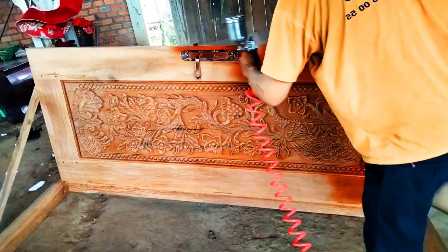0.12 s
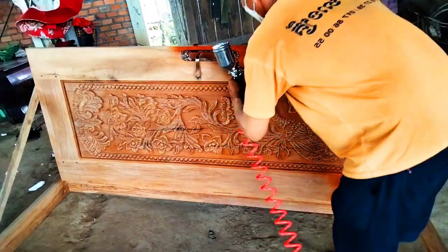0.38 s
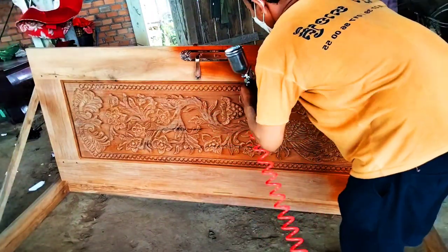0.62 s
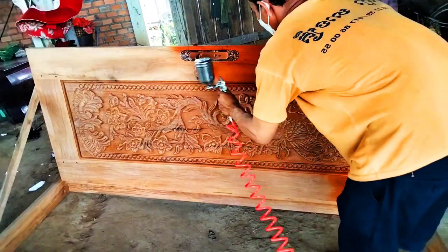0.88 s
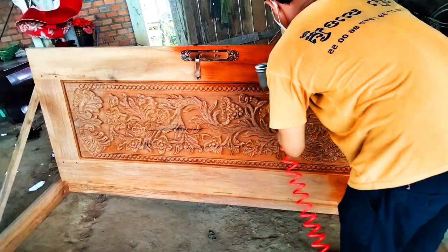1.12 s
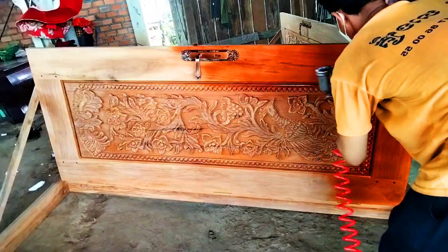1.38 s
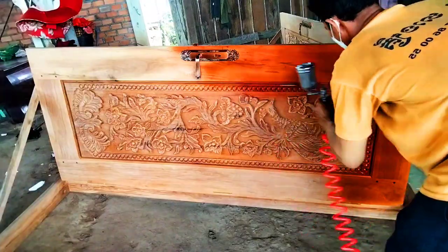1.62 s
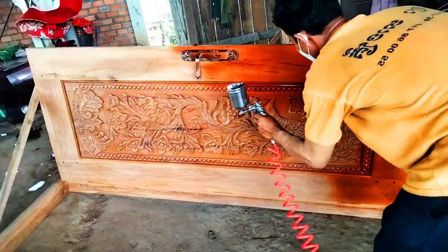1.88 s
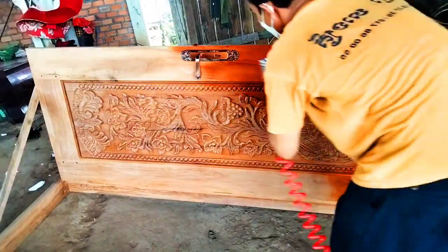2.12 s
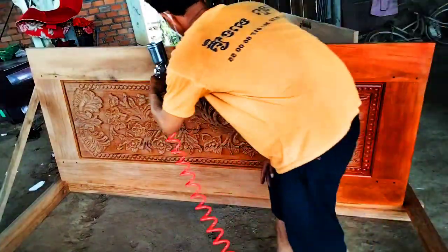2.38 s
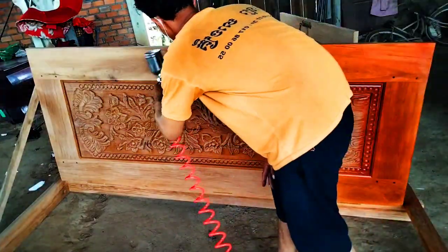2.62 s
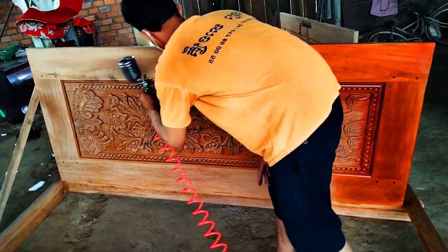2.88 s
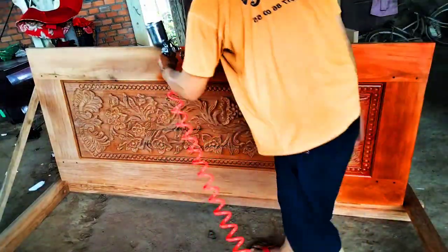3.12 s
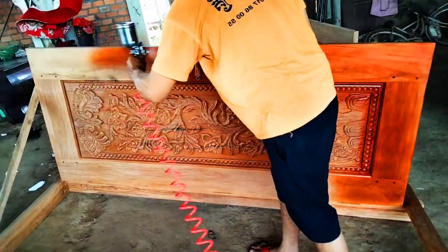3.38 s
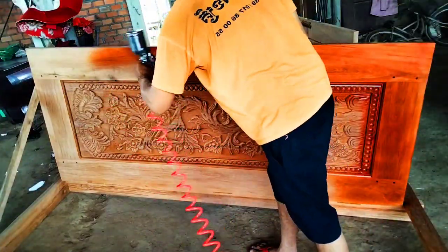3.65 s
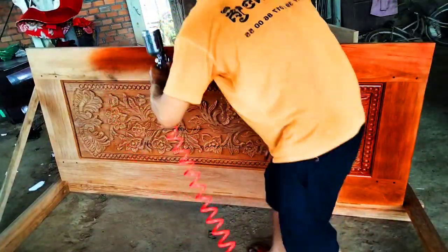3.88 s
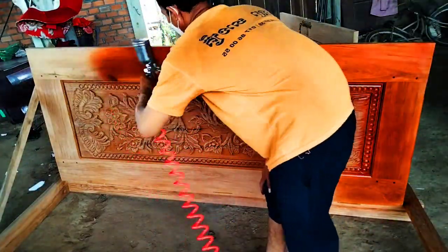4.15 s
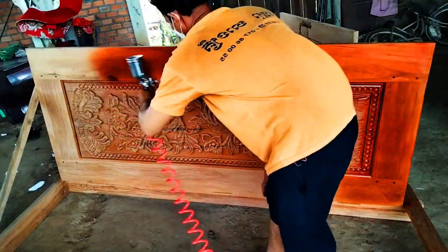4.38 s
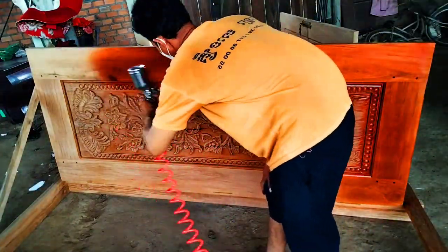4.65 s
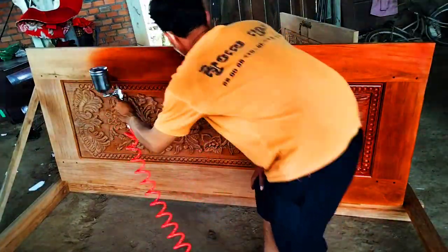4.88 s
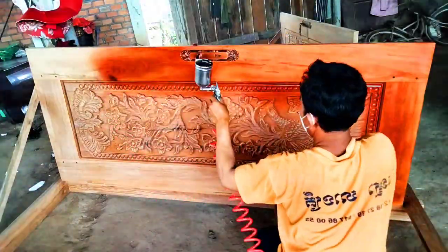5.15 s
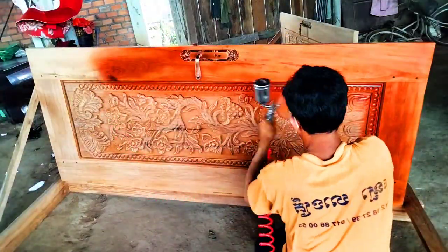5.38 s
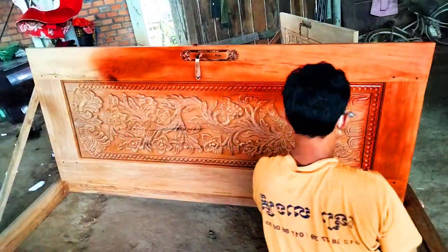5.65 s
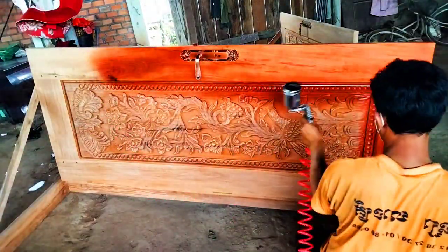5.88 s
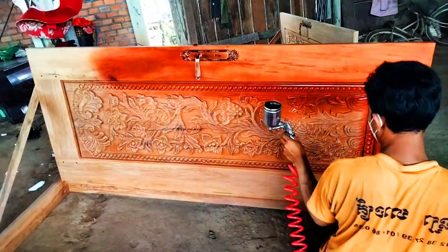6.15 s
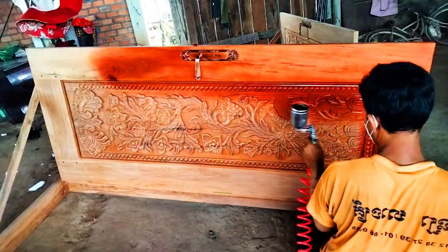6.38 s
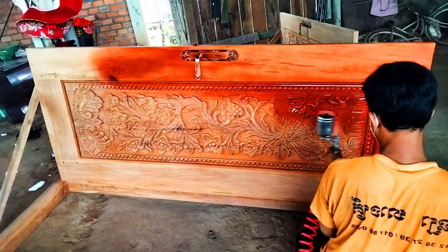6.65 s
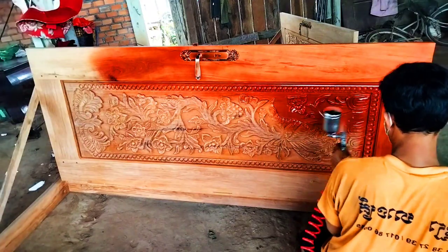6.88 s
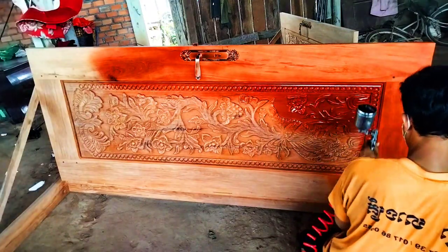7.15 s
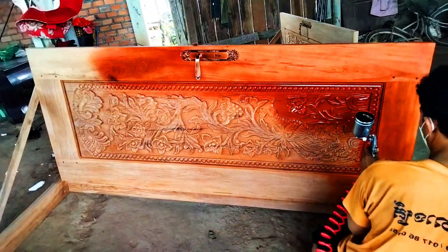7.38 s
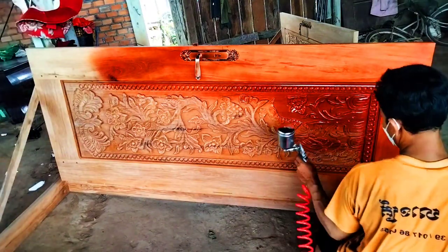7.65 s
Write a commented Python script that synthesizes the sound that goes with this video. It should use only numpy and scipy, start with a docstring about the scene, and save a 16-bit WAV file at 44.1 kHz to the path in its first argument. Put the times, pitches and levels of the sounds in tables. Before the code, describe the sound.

Continuous high mechanical whine and rushing air hiss from a paint sprayer, almost unchanging, with very faint low bumps and rumble underneath.

```python
"""An open workshop, where a spray gun lays finish on a carved wooden door.
A fast turbine whines as fluttering sines on many multiples of its shaft speed,
over the hiss of the air jet: shaped noise, heard with narrow gaps and flickering patches.
A slower motor hums below as low harmonics of an unsteady speed, in random phase.
Lumpy low noise rumbles faintly; faint low blips are short humped waves of random sign."""
import sys
import numpy as np
from scipy import signal
from scipy.io import wavfile
from scipy.ndimage import uniform_filter1d

SR = 44100
rng = np.random.default_rng(int(sys.argv[2]) if len(sys.argv) > 2 else 0)


def invert_db(level):
    """Linear amplitude ratio for a level in decibels (20 dB per decade), elementwise."""
    return 10 ** (np.asarray(level, dtype=float) / 20)


def wav_out(sig):
    """Save sig, one row per channel (or a flat mono array), as 16-bit PCM at SR to the path in sys.argv[1]."""
    wavfile.write(sys.argv[1], SR, np.round(np.clip(np.atleast_2d(sig).T, -1, 1) * 32767).astype(np.int16))


N = 342657


def rms_one(x):
    """Scale to an rms of 1."""
    return x / np.sqrt(np.mean(np.abs(x) ** 2) + 1e-20)


def in_time(rows):
    """Columns of a table, read at every sample; its first column is time in seconds."""
    s, *columns = np.transpose(rows)
    return [np.interp(np.arange(N) / SR, s, column) for column in columns]


def drift(rate_hz):
    """Slow noise of spread 1: a draw every 40 samples through a double one-pole low-pass."""
    r = np.exp(-2 * np.pi * rate_hz * 40 / SR)
    draws = rng.standard_normal(N // 40 + 2002)
    slow = signal.lfilter([1], [1, -2 * r, r * r], draws)[2000:]  # the first 2000 run the filter in
    return np.interp(np.arange(N) / 40, np.arange(len(slow)), rms_one(slow))


def angle(per_s):
    """Running angle of a shaft, in radians, from its turns per second."""
    return 2 * np.pi * np.cumsum(per_s) / SR


def partial(phase, db, rough, flutter_hz):
    """A sine whose size and phase flutter, which spreads a skirt of noise around its line."""
    size = np.sqrt(2) * invert_db(db)
    in_step = (1 + rough * drift(flutter_hz)) * np.sin(phase)
    out_of_step = rough * drift(flutter_hz) * np.cos(phase)
    return size * (in_step + out_of_step)


def shaft_speed(jitter_per_s=0.12, jitter_hz=8, twitch_s=0.025):
    """Turbine speed in turns per second: a slow course, a quick jitter and brief twitches."""
    # slow course of the turbine shaft: time_s, speed [turns per s]
    course = [(0, 359.25), (0.3, 359.4), (0.85, 359.5), (0.95, 359.05), (1.55, 358.95), (1.7, 359.1),
              (1.8, 358.85), (2.15, 359.1), (2.31, 358.65), (2.57, 358.55), (2.65, 359.1), (3.28, 359.25),
              (3.42, 359.6), (3.63, 359.8), (3.7, 359.4), (4.02, 359.25), (4.9, 359.75), (5.2, 359.55),
              (6.0, 359.7), (6.2, 359.55), (6.42, 360.25), (7.77, 360.4)]
    # brief twitches of the speed: centre_s, gain [turns per s]
    twitch_rows = [(3.36, 1.0), (6.105, -0.9)]
    t = np.arange(N) / SR
    twitches = sum(gain * np.exp(-.5 * ((t - s) / twitch_s) ** 2) for s, gain in twitch_rows)
    return in_time(course)[0] + jitter_per_s * drift(jitter_hz) + twitches


def turbine(rough=0.0024, flutter_hz=60, wander_db=0.43, waver_db=4.0):
    """No two turns are quite alike, so the high partials are the roughest."""
    # whine on shaft multiples 1, 2, 3 ..: start_level_db [dB rms], end_level_db [dB rms]
    whine_levels = [(-41, -40.5), (-40, -41), (-51.5, -47.5), (-47, -48.5), (-46, -48.5), (-56.5, -57.5),
                    (-48, -48.5), (-43, -40.5), (-60.5, -52), (-43, -45), (-36, -34.5), (-40, -48.5),
                    (-30, -31.5), (-32.5, -37.5), (-54, -41.5), (-45, -50.5), (-54.5, -48.5), (-50, -51),
                    (-44, -33.5), (-53, -43.5), (-37, -42.5), (-40.5, -42), (-52, -61), (-48.5, -44.5),
                    (-40, -66), (-46, -50), (-52, -76), (-54.5, -51), (-81, -51), (-69, -55), (-54, -50),
                    (-47, -49.5), (-56, -50), (-49, -73), (-47, -51), (-66, -40), (-48, -52), (-66, -59),
                    (-78, -59), (-74, -65), (-73, -68), (-49, -69), (-62, -78)]
    # bearing tones, whose level wavers at random: multiple [of the shaft speed], level_db [dB rms]
    bearing_tones = [(10.376, -51.5), (20.345, -72), (24.5, -55), (26.59, -54), (27.375, -70), (28.66, -66),
                     (29.438, -53.5), (30.44, -81), (32.81, -54), (37.75, -56)]
    # three high partials swell and sink: time_s, gain_13th_db, gain_19th_db, gain_21st_db
    sway_course = [(0, 0, 2, -3.5), (0.7, -1, 0.5, -3), (1.5, 0, 3, 0.5), (2.4, 0, 2.3, -1),
                   (2.9, 1, -7, -0.5), (3.6, -1, 0.5, 2.5), (3.9, 0, -7, 2.5), (4.2, 0.5, -2.5, 0),
                   (5.4, 0, -2, 2), (5.8, 1, -4.5, 0), (6.6, -1.5, -1, 0), (7.77, -2, -3, 1)]
    # which partials sway: multiple [of the shaft speed]
    swaying_multiples = (13, 19, 21)
    shaft = angle(shaft_speed())
    sway = dict(zip(swaying_multiples, in_time(sway_course)))
    out = 0
    for k, (start_db, end_db) in enumerate(whine_levels, start=1):
        db = np.linspace(start_db, end_db, N) + sway.get(k, wander_db * drift(0.99))
        # the duct smears each pulse in time: neighbours stand out of step and the whine throbs little
        phase = k * shaft + 2.28 * k ** 2
        out = out + partial(phase, db, rough * k, flutter_hz)
    for multiple, db in bearing_tones:
        out = out + partial(multiple * shaft, db + waver_db * drift(6.4), 0.066, 30)
    return out


def motor(jitter_per_s=0.25, jitter_hz=4, wander_db=0.32):
    """A hum of low harmonics of an unsteady motor speed, in random phase."""
    # course of the slower motor: time_s, fundamental_hz
    rate_course = [(0, 74.4), (0.35, 73.3), (0.6, 73.8), (1.0, 74.0), (1.4, 73.2), (1.66, 73.9),
                   (2.0, 72.8), (2.52, 73.6), (2.89, 72.8), (3.3, 75.2), (3.5, 74.2), (3.75, 75.4),
                   (4.13, 73.2), (4.66, 75.7), (5.03, 73.8), (5.3, 74.8), (5.64, 73.6), (6.2, 75.0),
                   (6.54, 74.3), (7.1, 75.2), (7.3, 74.2), (7.77, 74.3)]
    # its multiples 4, 5, 6 ..: level_db [dB rms]
    hum_levels = [-60, -57, -68.5, -47, -68.5, -53, -55, -57, -47.5, -55, -55.5, -65, -63, -61.5, -63.5,
                  -53, -62]
    shaft = angle(in_time(rate_course)[0] + jitter_per_s * drift(jitter_hz))
    out = 0
    for k, db in enumerate(hum_levels, start=4):
        phase = k * shaft + 2 * np.pi * rng.random()
        out = out + partial(phase, db + wander_db * drift(6.3), 0.13, 15)
    return out


def jet(level_db=-33, patchy_db=2.0, gap_flicker=0.63, ripple_db=-0.5, treble_flicker_db=1.6):
    """Hiss of turbulent air as shaped noise, heard with narrow gaps and flickering patches laid over it."""
    # colour of the air jet: pitch_hz, relative density_db [dB per Hz]
    colour = [(100, -80), (170, -48), (240, -14), (310, -2.5), (1000, -1), (1500, -2.5), (2200, -5),
              (3000, -3), (3800, 1.5), (4800, 3), (5700, -3), (6700, 1), (8000, -2), (9800, -7),
              (11500, -5), (13500, -5.5), (15500, -8)]
    # narrow gaps heard in the hiss: pitch_hz, width_hz, depth_db [before the flicker]
    gap_rows = [(1290, 80, -5), (1700, 100, -3), (2200, 150, -3), (3120, 120, -6), (3450, 150, -9),
                (4140, 130, -10), (4520, 60, -5), (5170, 120, -4), (5930, 150, -3), (7060, 170, -12),
                (7400, 130, -10), (7760, 100, -7), (8140, 130, -13), (8400, 120, -7), (9200, 100, -5),
                (9480, 150, -7), (9900, 100, -5), (10160, 110, -9), (10720, 110, -8), (12370, 150, -8),
                (12730, 160, -9), (13500, 100, -5), (13900, 150, -5), (14250, 120, -5), (14650, 150, -5)]
    hz, s, hiss = signal.stft(rng.standard_normal(N), SR, nperseg=2048)
    colour_hz, colour_db = np.transpose(colour)
    db = np.interp(np.log(hz + 1), np.log(colour_hz), colour_db)
    # many weak echoes of the shed ripple the spectrum
    db = db + ripple_db * rms_one(uniform_filter1d(rng.standard_normal(len(hz)), size=3))

    # small patches of pitch and time, deeper toward the treble
    field = uniform_filter1d(rng.standard_normal(hiss.shape), size=4, axis=0)
    patches = rms_one(uniform_filter1d(field, size=2, axis=1))
    db = db[:, None] + patchy_db * (1 + hz[:, None] / 15000) * patches

    # the whole treble flickers together
    shared = rms_one(uniform_filter1d(rng.standard_normal(len(s)), size=2))
    treble = np.clip(hz / 6000 - 1, 0, 1)
    db += treble_flicker_db * np.outer(treble, shared)

    for gap_hz, width_hz, depth_db in gap_rows:
        flicker = rms_one(uniform_filter1d(rng.standard_normal(len(s)), size=2))
        depth = depth_db * np.maximum(1 + gap_flicker * flicker, 0)  # a gap opens and closes
        shape = np.exp(-.5 * ((hz - gap_hz) / (.5 * width_hz)) ** 2)
        db += np.outer(shape, depth)
    shaped = signal.istft(hiss * invert_db(db), SR, nperseg=2048)[1][:N]
    return invert_db(level_db) * rms_one(shaped)


def rumble(lumpy_db=5.5):
    """Low noise in short lumps."""
    # faint rumble that comes and goes: time_s, level_db [dB rms]
    level_course = [(0, -64), (0.95, -58), (1.2, -75), (2.0, -66), (3.0, -67), (3.3, -90), (7.77, -82)]
    band = signal.butter(3, [140, 270], "band", fs=SR, output="sos")
    low = signal.sosfilt(band, rng.standard_normal(N))
    lumps = rms_one(low * invert_db(lumpy_db * drift(21.5)))
    return invert_db(in_time(level_course)[0]) * lumps


def low_blips():
    """Faint low blips, each a short humped wave of random sign."""
    # low blips: centre_s, level_db [dB peak], pitch_hz, length_s
    blip_rows = [(0.089, -54, 165, .024), (0.26, -47, 105, .024), (0.31, -47, 118, 0.016),
                 (0.442, -49, 158, .024), (0.514, -49, 65, .024), (0.547, -46, 108, 0.022),
                 (0.615, -46, 40, .026), (0.65, -49, 26, .03), (0.695, -52, 25, .03),
                 (0.772, -50, 76, 0.028), (0.853, -46, 60, .024), (0.87, -45, 23, 0.1),
                 (0.97, -48, 149, .024), (1.342, -46, 40, .05), (1.355, -44, 120, .024),
                 (1.652, -44, 48, .024), (2.288, -46, 64, 0.022), (2.35, -48, 135, 0.022),
                 (2.372, -45, 51, .024), (2.439, -48, 50, .024), (2.606, -42, 55, 0.026),
                 (2.634, -50, 30, .03), (2.821, -45, 48, .04), (3.026, -50, 48.2, 0.028),
                 (4.436, -50, 47.9, 0.028), (6.425, -50, 48.42, 0.026)]
    out, t = np.zeros(N), np.arange(N) / SR
    for (s, db, hz, length), turn in zip(blip_rows, rng.random((len(blip_rows), 1))):
        near = slice(round((s - length / 2) * SR), round((s + length / 2) * SR))
        since = t[near] - s
        hump = np.cos(np.pi * since / length) ** 2
        half_turn = .5 * np.round(turn)  # 0 or half a cycle
        out[near] += invert_db(db) * hump * np.cos(2 * np.pi * (hz * since + half_turn))
    return out


def spectral_holes(x, under_db=4.5, depth_db=-30.0):
    """Whatever lies well under its spectral surroundings drops out, leaving holes."""
    hz, s, spectra = signal.stft(x, SR, nperseg=2048)
    power = uniform_filter1d(np.abs(spectra) ** 2 + 1e-20, size=3, axis=-2)
    near_db = 10 * np.log10(uniform_filter1d(power, size=2, axis=-1) + 1e-20)
    around_db = uniform_filter1d(uniform_filter1d(near_db, size=61, axis=-2), size=9, axis=-1)
    margin_db = under_db * (1 - hz[:, None] / 30000)  # stricter in the treble
    hole = np.clip((around_db - margin_db - near_db) / 4, 0, 1)  # full depth 4 dB past the margin
    return signal.istft(spectra * invert_db(depth_db * hole), SR, nperseg=2048)[1][:, :N]


def scene():
    """One microphone feeds both channels."""
    mono = turbine() + motor() + jet() + rumble() + low_blips()
    return np.tile(mono, (2, 1))


def band_limit(x):
    """A steep low-pass at the top of the band."""
    return signal.sosfilt(signal.butter(12, 16570, fs=SR, output="sos"), x)


def record(dry):
    """Holes open in the spectrum and the top is cut steeply above 15530 Hz."""
    top_cut = signal.ellip(16, .3, 95, 15530, fs=SR, output="sos")
    mix = signal.sosfilt(top_cut, spectral_holes(dry))
    return band_limit(mix)


dry = scene()
out = record(dry)
wav_out(out)
```